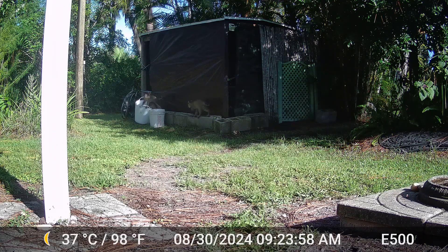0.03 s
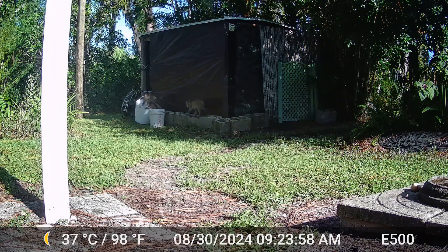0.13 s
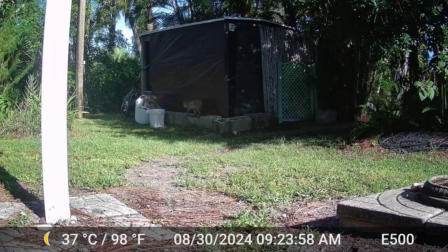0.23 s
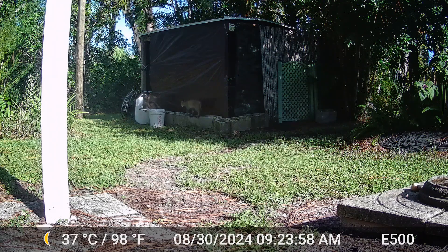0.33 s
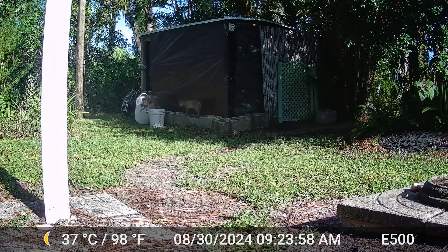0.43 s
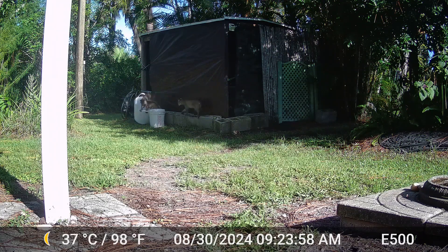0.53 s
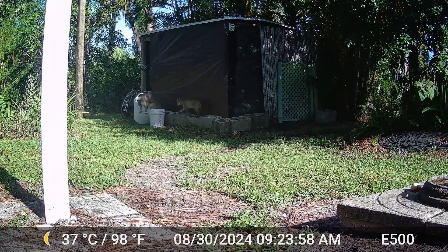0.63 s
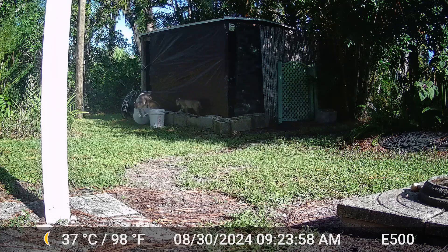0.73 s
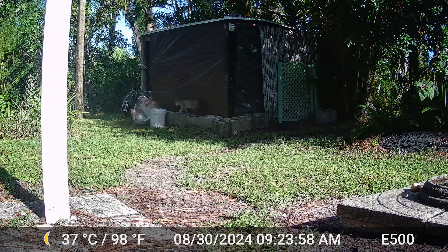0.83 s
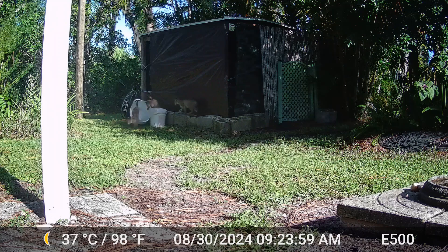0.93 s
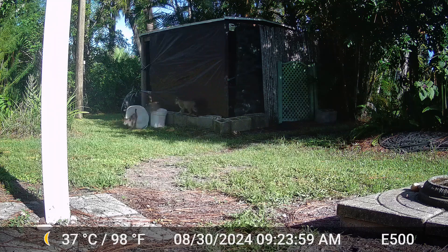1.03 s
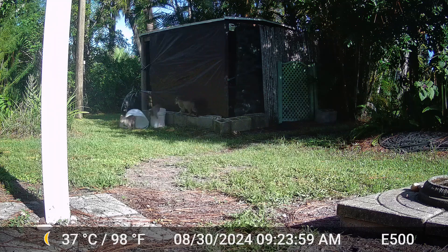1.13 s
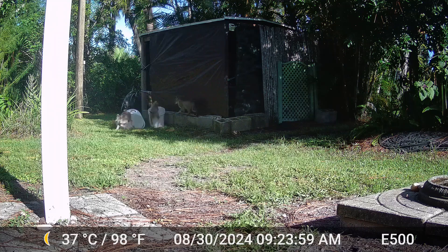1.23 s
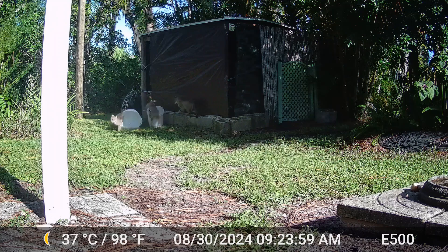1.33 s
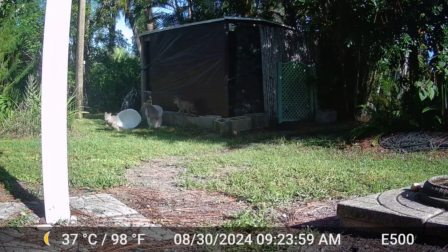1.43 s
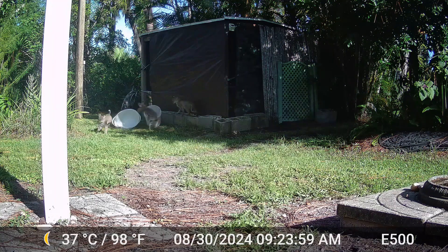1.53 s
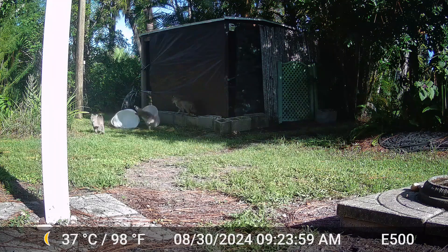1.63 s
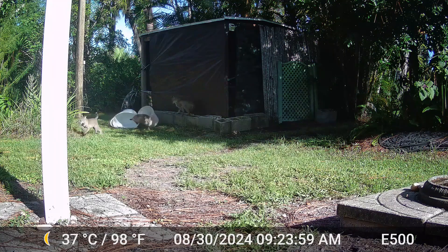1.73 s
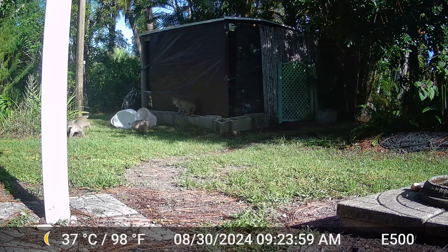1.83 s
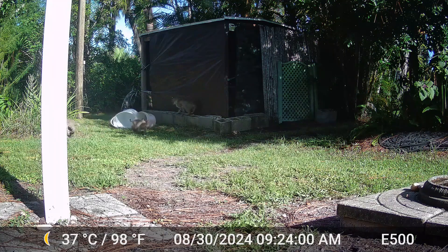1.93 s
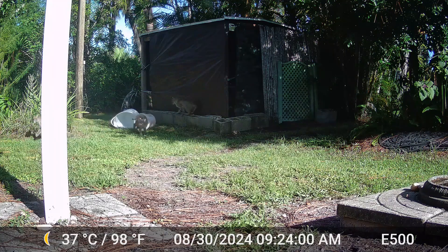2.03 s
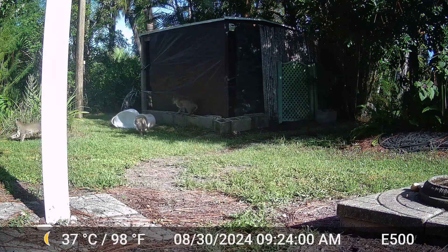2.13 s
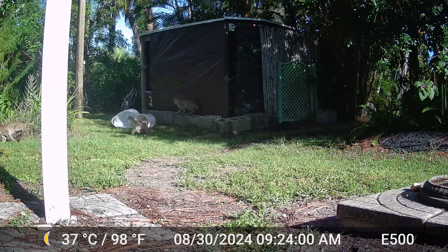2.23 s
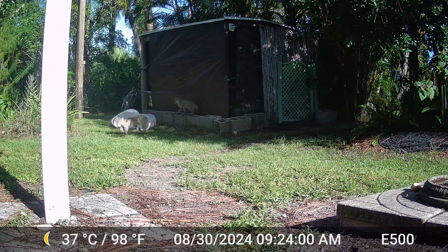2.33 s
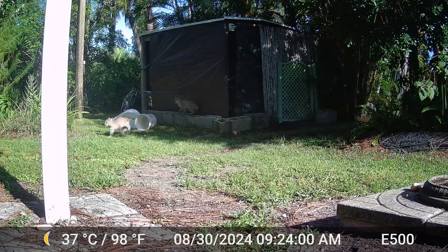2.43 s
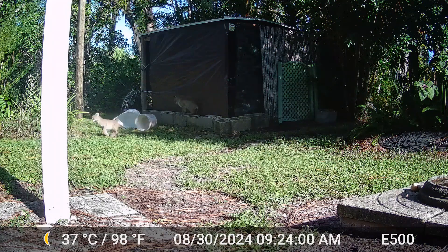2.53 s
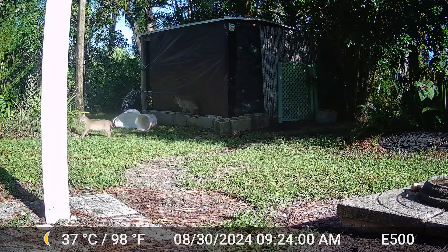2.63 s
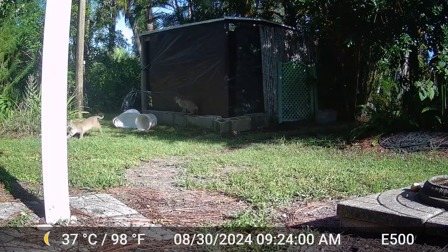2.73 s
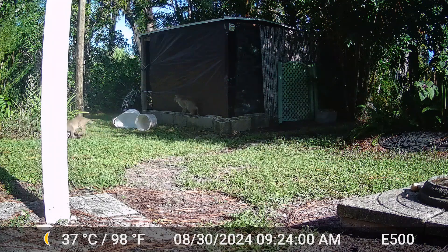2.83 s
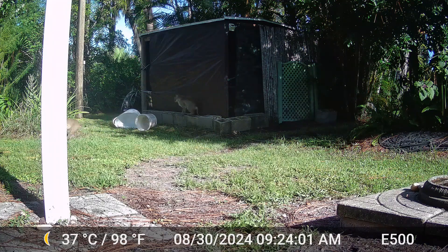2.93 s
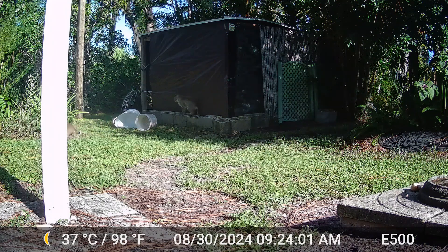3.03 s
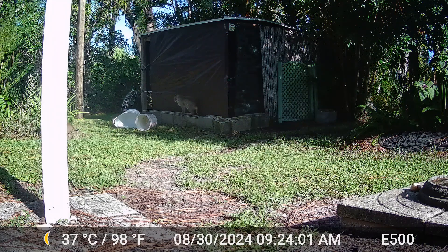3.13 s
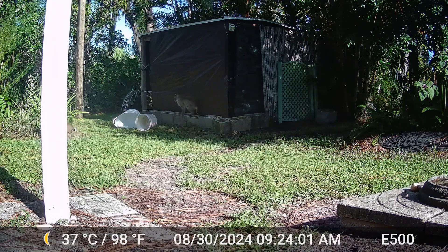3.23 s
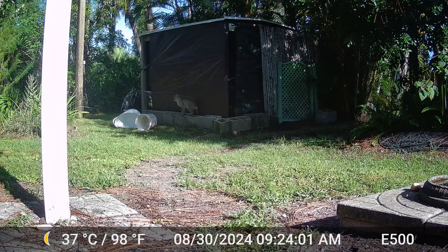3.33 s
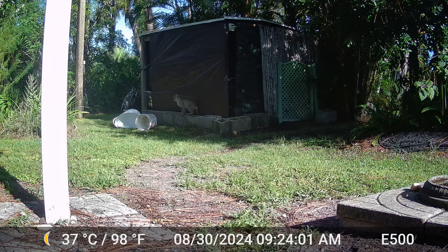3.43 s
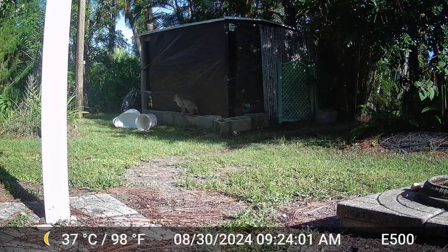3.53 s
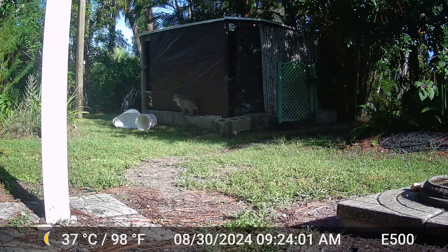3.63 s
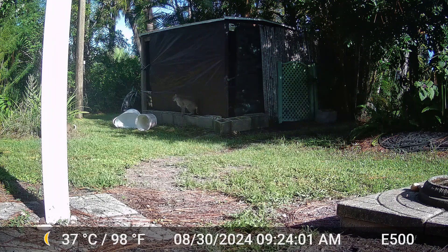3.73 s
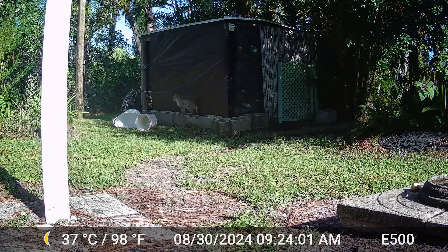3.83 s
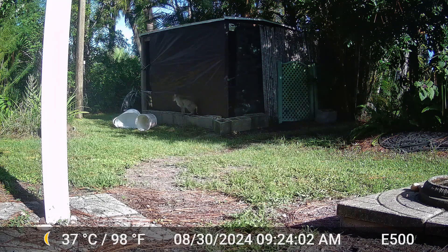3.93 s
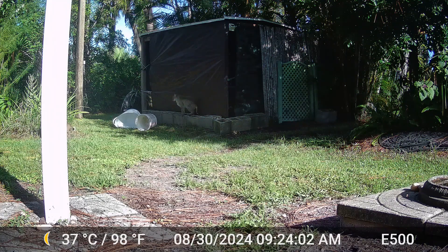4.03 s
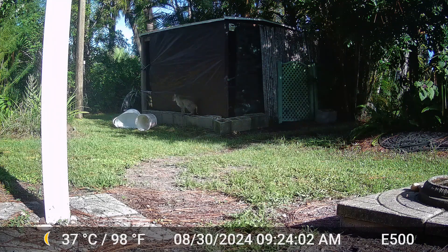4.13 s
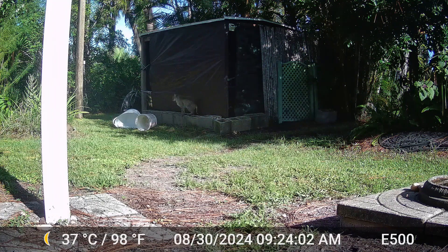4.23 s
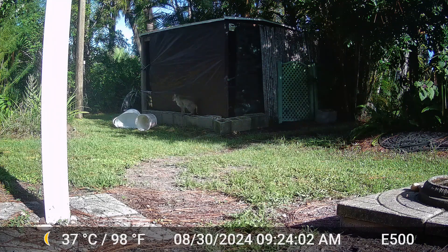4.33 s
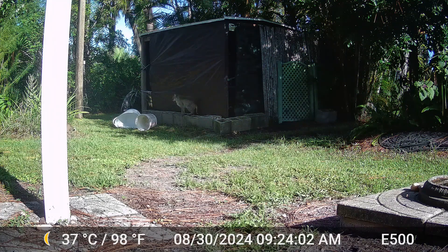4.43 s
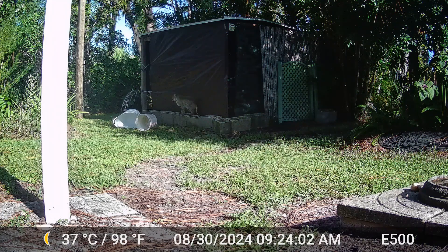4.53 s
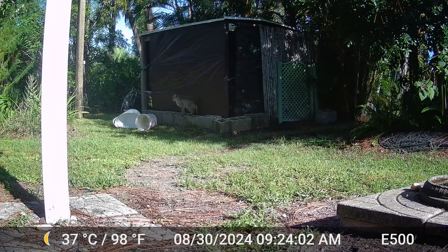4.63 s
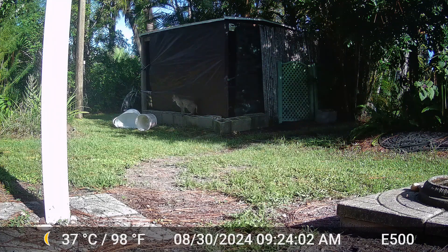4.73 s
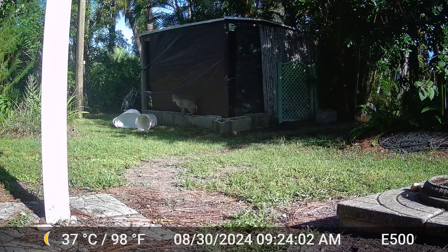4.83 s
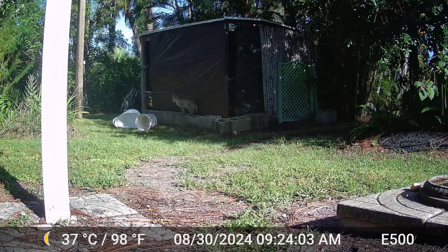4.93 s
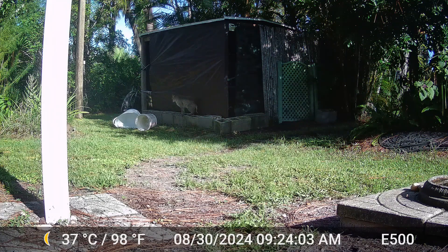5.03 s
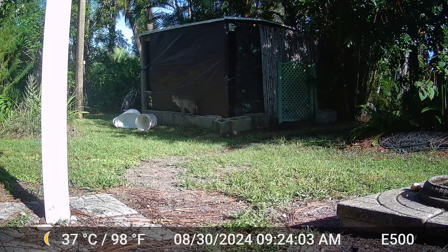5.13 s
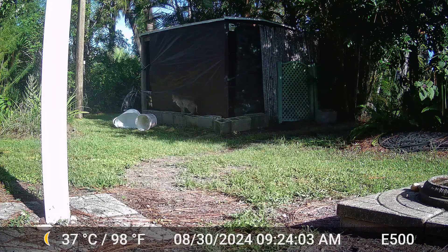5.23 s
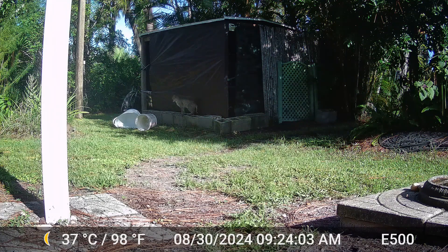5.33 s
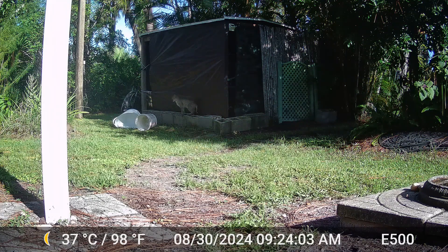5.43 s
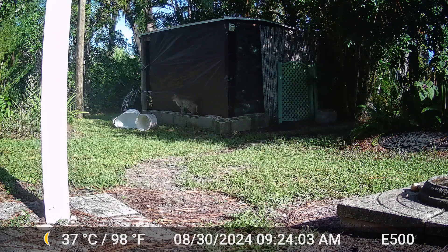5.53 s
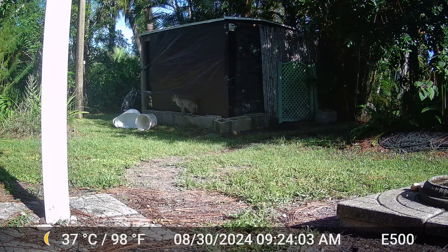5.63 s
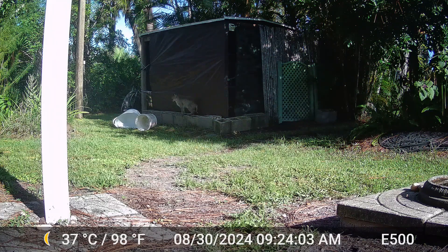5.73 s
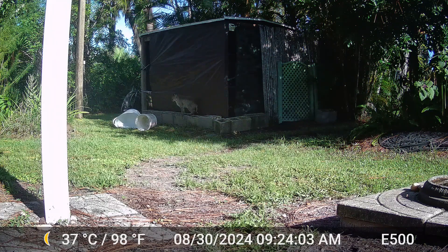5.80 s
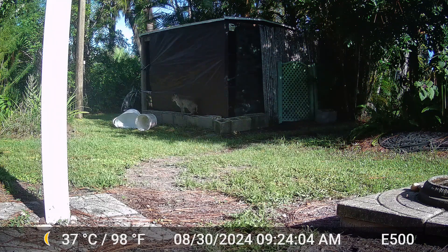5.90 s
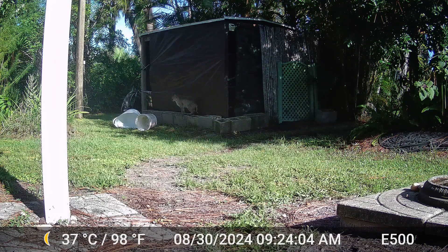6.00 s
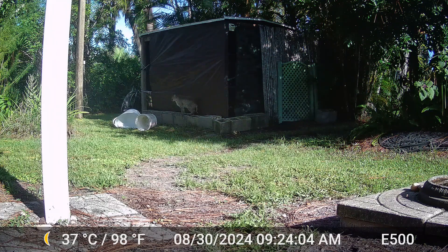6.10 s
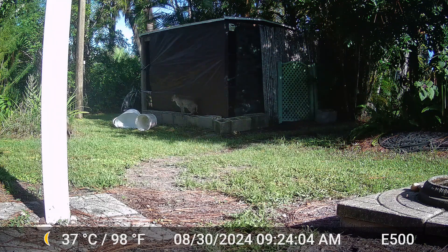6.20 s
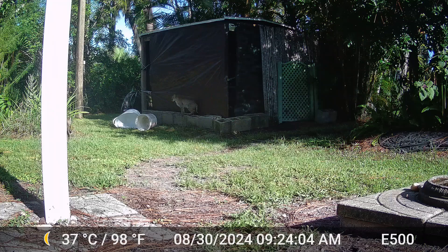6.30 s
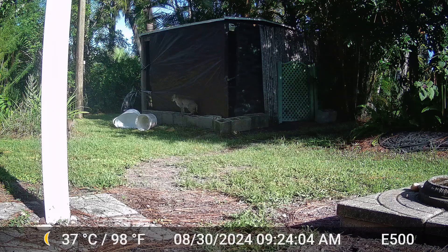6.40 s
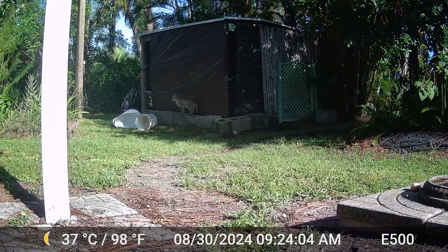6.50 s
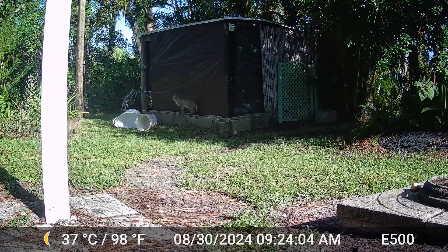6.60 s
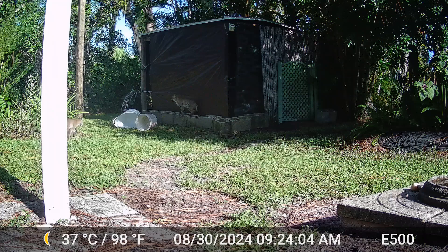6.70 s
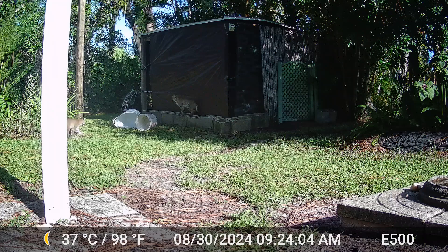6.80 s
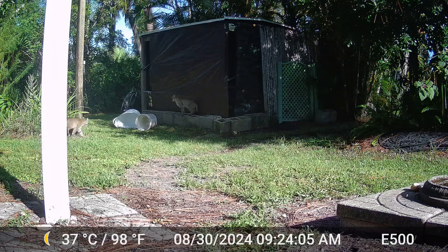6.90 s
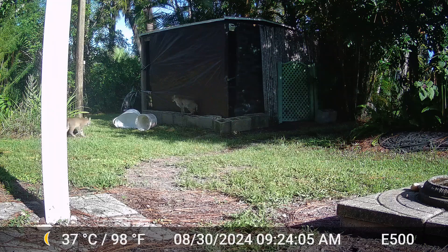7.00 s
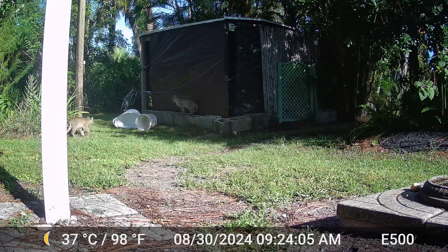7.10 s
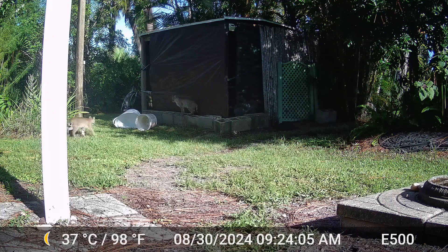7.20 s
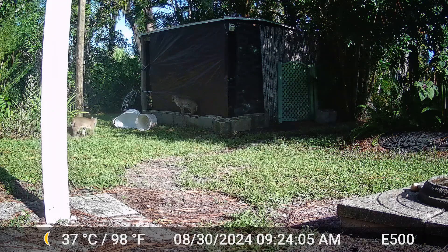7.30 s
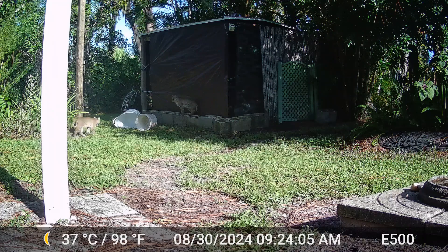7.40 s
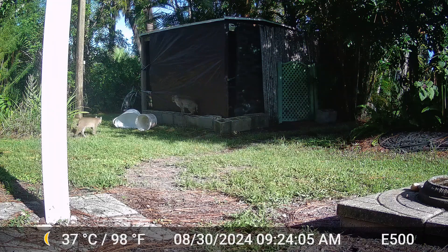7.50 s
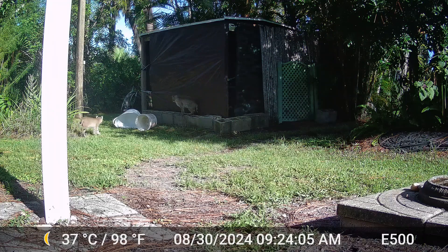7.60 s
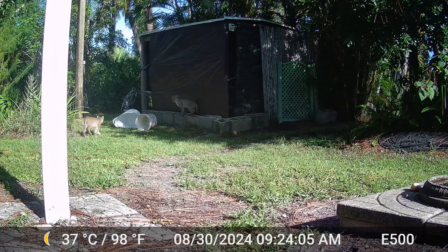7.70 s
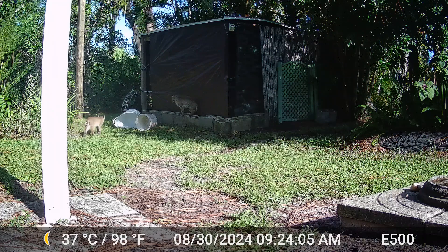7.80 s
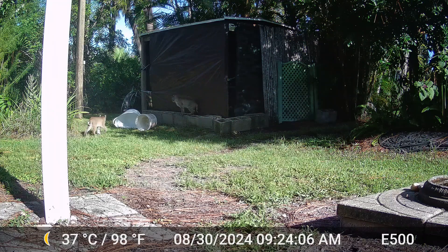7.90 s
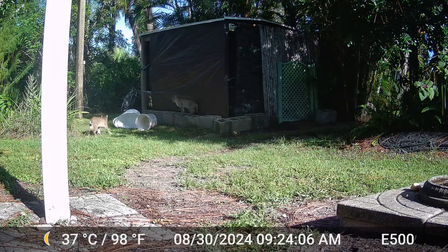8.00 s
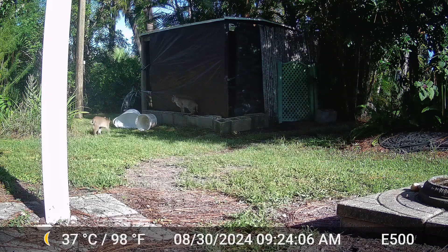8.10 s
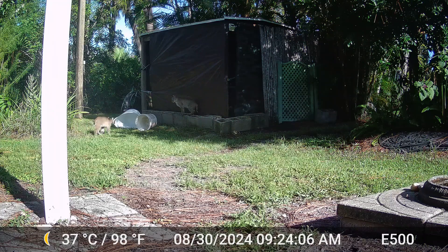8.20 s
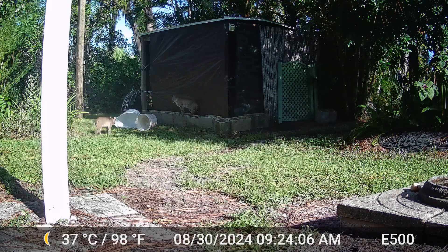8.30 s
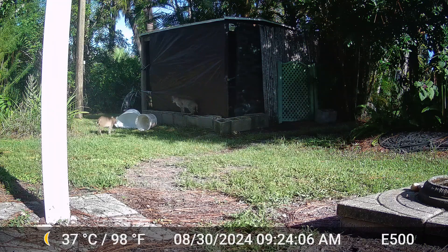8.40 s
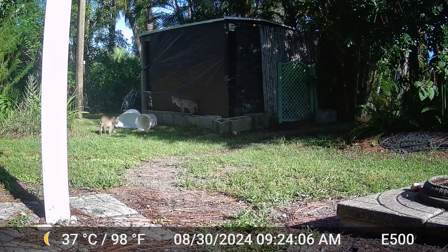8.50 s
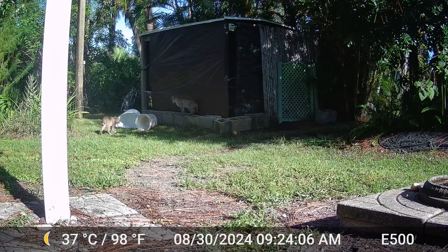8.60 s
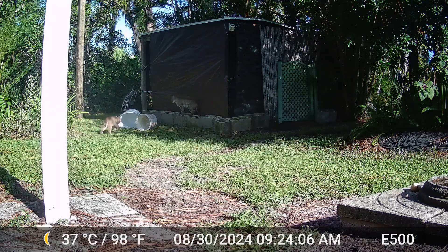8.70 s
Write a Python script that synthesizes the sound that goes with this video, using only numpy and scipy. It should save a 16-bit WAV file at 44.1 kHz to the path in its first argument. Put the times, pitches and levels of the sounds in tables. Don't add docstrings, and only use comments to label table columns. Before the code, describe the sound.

A yard by a shed, heard through a dull camera housing. Low distant traffic rumble, a far engine idling with a slow beating hum, and soft open-air murmur continue throughout. The camera adds a rapid low fluttering buzz, a thin high whine and small bright ticks with crackle every fraction of a second. Faint plastic taps come at 0.5-0.7 s. At 1.05 s buckets clash in a tight hollow clatter, with smaller knocks at 1.2 s, then the loudest, deepest thump at 1.4 s as one falls. A lighter bucket lands at 2.07 s, followed by faint taps to 2.4 s. Short shed echoes trail the knocks. Paws rustle in grass, strongest around 1.3 and 2.2 s, again at 4.85-5.3 s. Sparse dull taps occur from 4.7 to 5.8 s. Brief harsh electrical rasps strike at 4.28 and 6.27 s. The rest is rumble, buzz and ticks until about 8.7 s.

```python
import sys
import numpy as np
from scipy import signal
from scipy.fft import rfft, irfft, next_fast_len
from scipy.io import wavfile
from scipy.ndimage import uniform_filter1d

SR = 44100
rng = np.random.default_rng(int(sys.argv[2]) if len(sys.argv) > 2 else 0)


def transcribe(u):
    v = np.clip(np.atleast_2d(u).T, -1, 1)
    q = np.round(v * 32767).astype(np.int16)
    wavfile.write(sys.argv[1], SR, q)


def how_loud(loudness_db):
    steps = np.asarray(loudness_db, float) / 20
    return 10 ** steps


N = 385875
FRAME_S = 1 / 30
RUN_IN = 4410


def rms_one(x):
    return x / np.sqrt(np.mean(x ** 2) + 1e-20)


def butter(x, hz, kind, order=2):
    return signal.sosfilt(signal.butter(order, hz, kind, fs=SR, output="sos"), x)


def coloured(spectrum):
    size = next_fast_len(N)
    hz, db = np.transpose(spectrum)
    bin_hz = np.arange(size // 2 + 1) * SR / size
    gain = how_loud(np.interp(np.log(bin_hz + 1), np.log(hz), db))
    return rms_one(irfft(rfft(rng.standard_normal(size)) * gain, size)[:N])


def drift(rate_hz):
    return rms_one(butter(rng.standard_normal(N + SR), rate_hz, "low")[SR:])


def smooth_twice(x, size):
    return uniform_filter1d(uniform_filter1d(x, size=size), size=size)


def evened(x):
    power = smooth_twice(x ** 2, 3000)
    return rms_one(x / np.sqrt(power))


def bumps(t, rows, width_s):
    return sum(size * np.exp(-((t - s) / width_s) ** 2) for s, size in rows)


def add(out, s, piece):
    at = round(s * SR)
    out[at:at + len(piece)] += piece[:len(out) - at]


def traffic_rumble():
    # (time [s], swell [dB])
    passes = [
        (1.4, 1),
        (2.9, 0),
        (7.9, 0.5),
    ]
    # (frequency [Hz], level [dB per Hz])
    deep = [(20, -25), (35, -24), (55, 9), (68, 8), (80, -14.5), (100, -40.5)]
    upper = [(60, -48), (78, 12.5), (92, 7.5), (115, 9), (140, -6), (200, -33)]
    upper_db = -47 + bumps(np.arange(N) / SR, passes, width_s=1.0)
    return how_loud(-53) * coloured(deep) + how_loud(upper_db) * evened(coloured(upper))


def idling_engine():
    # (time [s], speed [turns per s])
    speed = [(0, 21.437), (1.3, 21.427), (2, 21.37), (3, 21.327), (4.5, 21.28), (5.6, 21.257),
             (6.2, 21.317), (8, 21.39), (8.75, 21.407)]
    orders = {2: -68.5, 3: -46.5, 4: -65.5, 5: -63}
    turns = np.cumsum(np.interp(np.arange(N) / SR, *np.transpose(speed))) / SR
    return sum(-how_loud(db) * np.cos(2 * np.pi * k * turns) for k, db in orders.items())


def yard_murmur():
    # (frequency [Hz], level [dB per Hz])
    spectrum = [(60, -12), (150, 9.5), (300, -2.5), (620, -6), (850, -17.5), (5000, -26.5), (6800, -29),
                (8400, -60)]
    flicker_db = 0.4 * drift(6)
    return how_loud(-47 + flicker_db) * coloured(spectrum)


def scuffling():
    # (time [s], level above the usual stir [dB])
    scuffles = [
        (.55, 3),
        (1.3, 10.5),
        (2.2, 7),
        (3.1, 2.5),
        (4.85, 7.5),
        (5.28, 6.5),
        (6.7, 2.5),
    ]
    # (frequency [Hz], level [dB per Hz])
    grass = [(250, -12.5), (420, -7), (600, 0), (780, -10.5), (950, -21), (1500, -53)]
    lumps_db = 2.1 * drift(25)
    level_db = -60.5 + bumps(np.arange(N) / SR, scuffles, width_s=0.23) + lumps_db
    return how_loud(level_db) * coloured(grass)


def settle(edges, settle_ms):
    r = np.exp(-1000 / (settle_ms * SR))
    return signal.lfilter([1 - r], [1, -r], edges)


def frame_load():
    # (time after frame start [ms], step [thousandths], settling time [ms],
    # floating timing [1 = yes])
    tasks = [(9.98, -23.7, .19, 0), (10.49, 7.4, .06, 0), (12.37, -10.9, 1.2, 0), (23.38, -18, .25, 1),
             (24.0, 12, .08, 1), (24.36, -54, 1.0, 1), (29.66, 26.7, .45, 0), (29.82, -50, .27, 0),
             (31.02, 42.7, .6, 0), (31.44, 57.2, .6, 0), (33.37, 68, 3.6, 0)]
    # (time [s], extra load [share of the usual load])
    surges = [(.37, 0.43), (1.3, 1), (1.38, 0.64), (1.49, 0.5), (1.78, 0.055), (1.97, 0.54), (2.27, 0.29),
              (2.65, -0.14), (2.97, 0.25), (3.4, 0.57), (3.55, 0.042), (3.76, 0.15), (4.82, 0.87),
              (5.29, 0.64), (5.38, 0.32), (5.55, .3), (6.4, 0.04), (6.66, 0.35), (7.3, 0.52), (7.75, -0.79),
              (7.83, .45), (8.5, 0.43), (8.72, 0.57)]
    starts = np.arange(-3, N / SR / FRAME_S - 1) * FRAME_S
    late_ms = 0.11 * rng.standard_normal(len(starts))
    sizes = 1 + 0.23 * rng.standard_normal((len(starts), len(tasks)))
    slope = np.zeros(N + RUN_IN)
    for k, (ms, step, settle_ms, floats) in enumerate(tasks):
        at = (starts + (ms + floats * late_ms) / 1000) * SR + RUN_IN
        edges = np.zeros(N + 2 * RUN_IN)
        edges[np.round(at).astype(int)] = step / 1000 * sizes[:, k]
        slope += settle(edges[:N + RUN_IN], settle_ms)
    t = (np.arange(N + RUN_IN) - RUN_IN) / SR
    load = bumps(t, surges, width_s=0.03)
    load[RUN_IN:] += 0.099 * drift(4.7)
    extra = 2.9 * load * (slope - slope.mean())
    return np.cumsum(slope + smooth_twice(extra, 210))


def stray_tasks():
    # (time [s], depth [dB], length [ms])
    deep_task = (7.7629, -25, 1.4)
    tasks_per_s = 25
    out = np.zeros(N)
    for when, size, length in rng.random((400, 3))[:int(tasks_per_s * N / SR)]:
        samples = int((0.77 + 0.88 * length) * SR / 1000)
        add(out, when * (N - 1) / SR, np.full(samples, -how_loud(-40 + 6.6 * size)))
    s, db, ms = deep_task
    add(out, s, np.full(int(ms * SR / 1000), -how_loud(db)))
    return settle(out, 0.47)


def card_writes():
    # (start time [s], pages in a row [count])
    writes = [
        (4.27603, 3),
        (4.28808, 2),
        (4.29486, 2),
        (6.27099, 2),
        (6.2759, 2),
    ]
    page_s, gap_s = 0.002, 0.00011
    sag_ms, recover_ms = 0.11, 0.057
    out = np.zeros(N)
    t = np.arange(SR // 100) / SR
    for first, pages in writes:
        for k in range(pages):
            start = first + k * (page_s + gap_s)
            late = t - (start - round(start * SR) / SR)
            sag = 1 - np.exp(-1000 * np.clip(late, 0, page_s) / sag_ms)
            recovery = np.exp(-1000 * np.clip(late - page_s, 0, 1) / recover_ms)
            add(out, start, -0.56 * sag * recovery)
    return out + 1.35 * butter(out, 5500, "high")


def supply_ripple():
    supply = frame_load()
    supply[RUN_IN:] += card_writes() + stray_tasks()
    coupling_hz, coupling_q = 90.7, 0.836
    w = 2 * np.pi * coupling_hz
    b, a = signal.bilinear([1, 0, 0], [1, w / coupling_q, w * w], SR)
    return signal.lfilter(b, a, supply)[RUN_IN:]


def sensor_whine():
    # (time after frame start [ms], level [dB])
    curve = [(0, -86), (9.8, -101), (11.5, -59), (17, -65.5), (18, -74), (20.5, -73), (22.5, -56.5),
             (24, -81.5), (33.4, -85)]
    t = np.arange(N) / SR
    level_db = np.interp(t % FRAME_S * 1000, *np.transpose(curve))
    pitch_hz = 5200 + 60 * drift(193)
    return how_loud(level_db) * np.sin(2 * np.pi * np.cumsum(pitch_hz) / SR)


def patch(hz, ms):
    t = np.arange(int(ms * SR / 1000)) / SR
    return np.sin(np.pi * t * 1000 / ms) * np.sin(2 * np.pi * hz * t)


def data_bursts():
    # (time [s], tick peak level [dB], length [ms])
    bursts = [(0.255, -48, 38), (0.5147, -46, 15), (0.9617, -46, 26), (1.23, -46, 36), (1.661, -48, 10),
              (2.1136, -45, 21.6), (2.2447, -45, 15), (2.373, -44, 22), (2.759, -46, 17), (3.2628, -43, 35),
              (3.5229, -45, 16), (3.9737, -44, 14), (4.2298, -43, 96), (4.334, -55, 33), (4.362, -48, 28),
              (4.6724, -45, 26), (5.123, -46, 18), (5.255, -49, 18), (5.374, -46, 18), (5.823, -48, 20),
              (6.2282, -49, 36), (6.535, -46, 18), (6.974, -43, 23), (7.24, -41, 37), (7.683, -45, 17),
              (8.136, -47, 21), (8.2554, -44, 18), (8.3823, -45, 16)]
    # (time [s], pulse rate [pulses per s], level [dB], length [ms])
    transfer = (4.347, 1760, -50, 12)
    tones, gate = np.zeros(N), np.zeros(N)
    chance = rng.standard_normal((len(bursts), 3))
    for (s, tick_db, ms), (louder, later, busy) in zip(bursts, chance):
        crackle_db = -54.5 + 1.7 * busy
        tick = how_loud(tick_db - 0.5) * patch(4650 + 80 * later, 2.6)
        singing = how_loud(crackle_db - 0.5 + 1.6 * louder) * patch(3140, 8.3)
        add(tones, s, tick)
        add(tones, s + 0.014 + 0.0021 * later, singing)
        add(gate, s + 0.0015, np.full(round(ms * SR / 1000), how_loud(crackle_db)))
    s, per_s, db, ms = transfer
    pulses = 0.6 * patch(per_s, ms) + patch(2 * per_s, ms) + 0.4 * patch(4 * per_s, ms)
    add(tones, s, how_loud(db) * pulses)
    steps = rng.standard_normal(N) * (rng.random(N) < 3000 / SR)
    crackle = rms_one(butter(butter(steps, 3350, "low", order=1), 520, "high"))
    uneven_gate = butter(gate * how_loud(1.46 * drift(124)), 200, "low")
    return tones + uneven_gate * crackle


def soft_ring(hz, ring_ms):
    t = np.arange(SR // 8) / SR
    u = t / (ring_ms / 1000)
    return (u * np.exp(1 - u)) ** 2.05 * np.sin(2 * np.pi * hz * t)


def bucket_wall(db, hz, ring_ms):
    up, down = rng.standard_normal(size=2)
    higher = how_loud(-16 + 2 * up) * soft_ring(1.346 * hz, 0.33 * ring_ms)
    lower = how_loud(-26.5 + 2 * down) * soft_ring(0.8 * hz, 1.6 * ring_ms)
    return how_loud(db) * (soft_ring(hz, ring_ms) + higher - lower)


def buckets():
    # (time [s], level [dB], wall pitch [Hz])
    taps = [(.513, -42, 720), (.686, -38, 543), (.705, -42, 600), (.73, -51, 574), (1.063, -50, 1570),
            (1.107, -33, 580), (1.238, -42, 715), (1.345, -36, 524), (1.352, -38, 720), (2.088, -40, 680),
            (2.305, -45, 620), (2.353, -45.5, 1076), (4.695, -36, 440), (5.027, -44, 530),
            (5.157, -33.5, 605), (5.27, -39.5, 604), (5.337, -47, 480), (5.829, -41, 775)]
    # (time [s], wall level [dB], wall pitch [Hz], hollow level [dB])
    clashes = [(1.048, -24.5, 723, -32), (1.052, -30, 400, -34), (1.0555, -16, 373, -14),
               (1.0592, -6.5, 604, -31), (1.0605, -18, 874, -22), (1.0626, -9.5, 566, -15),
               (1.071, -27, 540, -22), (1.075, -36, 590, -27), (1.08, -21, 635, -17.5),
               (1.087, -26, 684, -43), (1.204, -31, 682, -47), (1.21, -32.5, 698, -44),
               (1.216, -31, 625, -28), (1.223, -37, 500, -29), (1.3785, -25, 620, -19.5),
               (1.383, -25.5, 724, -27), (1.387, -26, 523, -15.5), (1.398, -27, 515, -24),
               (1.415, -25.5, 725, -37), (1.421, -29, 557, -33), (1.428, -29, 466, -24),
               (2.0651, -34, 820, -49), (2.075, -25.5, 603, -25)]
    # (time [s], wall level [dB], wall pitch [Hz], hollow level [dB])
    landings = [
        (1.059, -49, 1086, -14.5),
        (1.4086, -15, 498, -5),
        (2.0655, -16.5, 620, -25),
    ]
    # (delay [ms], level [dB])
    shed_echoes = [(9, -16), (17, -16), (29, -24), (43, -30.5)]
    upright_hz, lying_hz = 280, 190.5
    out = np.zeros(N)
    for s, db, hz in taps:
        add(out, s, bucket_wall(db, hz, 6.3))
    for rows, hollow_hz, ring_ms in [(clashes, upright_hz, 3.9), (landings, lying_hz, 2.73)]:
        for s, wall_db, wall_hz, hollow_db in rows:
            hollow = how_loud(hollow_db) * soft_ring(hollow_hz, 0.92 * ring_ms)
            add(out, s, bucket_wall(wall_db, wall_hz, ring_ms) - hollow)
    for s, _, _, hollow_db in landings:
        ground_slap = -how_loud(hollow_db - 11) * soft_ring(340, 1.2)
        rim_crack = how_loud(hollow_db - 35) * soft_ring(1250, 1.6)
        hollow_boom = -how_loud(hollow_db - 9.5) * soft_ring(lying_hz, 9.3)
        add(out, s - 0.0014, ground_slap)
        add(out, s, rim_crack + hollow_boom)
    echoes = sum(how_loud(db) * np.roll(out, round(ms * SR / 1000)) for ms, db in shed_echoes)
    return butter(out + echoes, 1360, "low", order=3)


def scene():
    outdoors = traffic_rumble() + idling_engine() + yard_murmur() + scuffling()
    electronics = supply_ripple() + sensor_whine() + data_bursts()
    return (outdoors + electronics + buckets())[None]


def roll_off(x):
    return signal.sosfilt(signal.butter(12, 16460, fs=SR, output="sos"), x)


def record(dry):
    inner_rate, filter_lag_s = 16000, 0.00013
    t = np.arange(N) / SR
    ticks = np.arange(int(N / SR * inner_rate) + 2) / inner_rate
    samples = np.interp(ticks + filter_lag_s, t, butter(dry[0], 8500, "low"))
    stretched = butter(np.interp(t, ticks, samples), 16000, "low")
    steep = signal.cheby2(10, 40, 16600, fs=SR, output="sos")
    mix = signal.sosfilt(steep, stretched)[None]
    return roll_off(mix)


dry = scene()
out = record(dry)
transcribe(out)
```